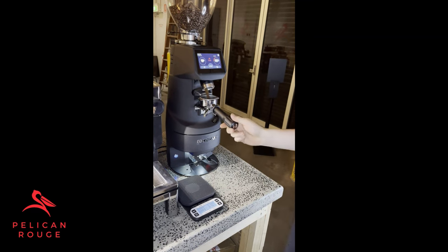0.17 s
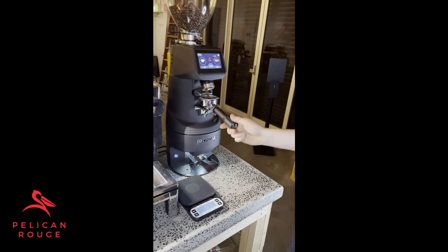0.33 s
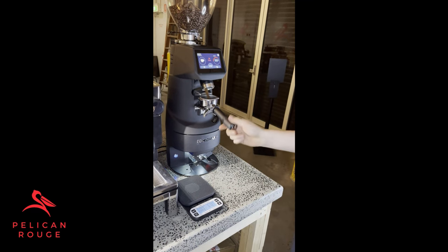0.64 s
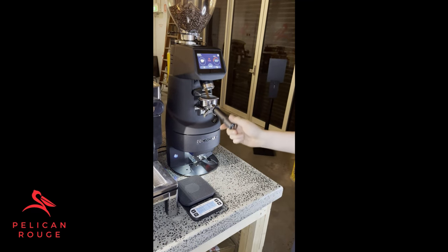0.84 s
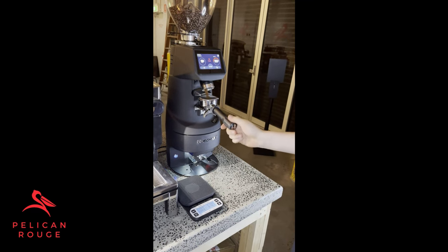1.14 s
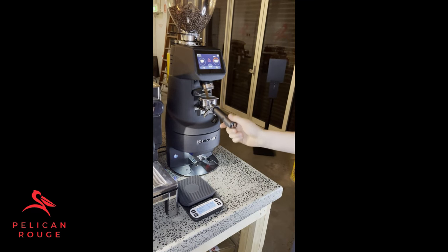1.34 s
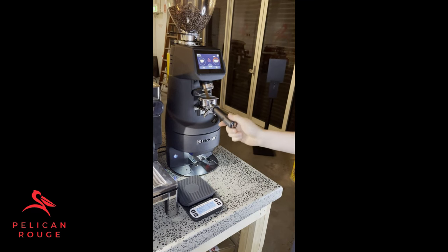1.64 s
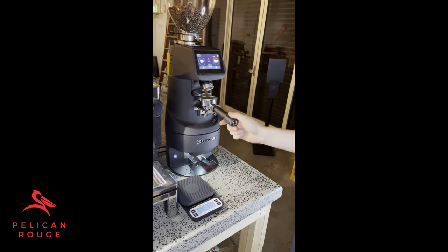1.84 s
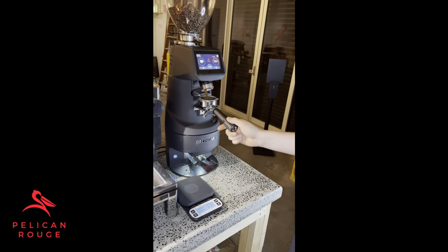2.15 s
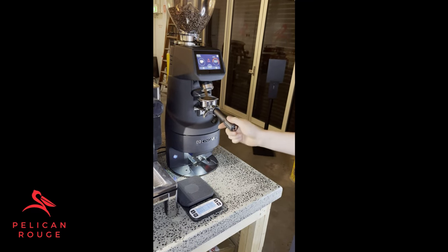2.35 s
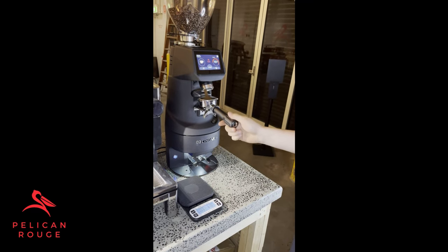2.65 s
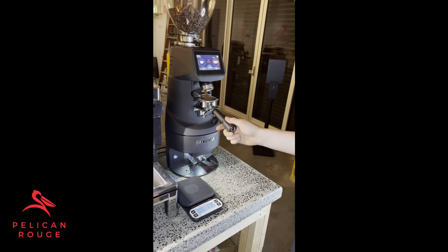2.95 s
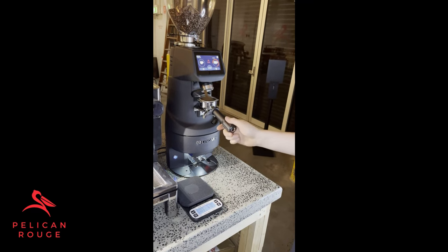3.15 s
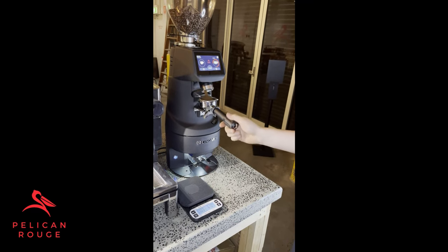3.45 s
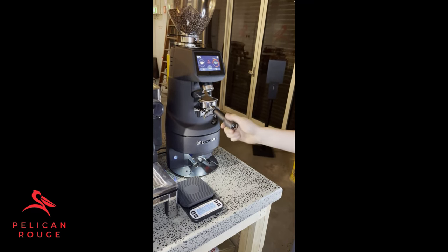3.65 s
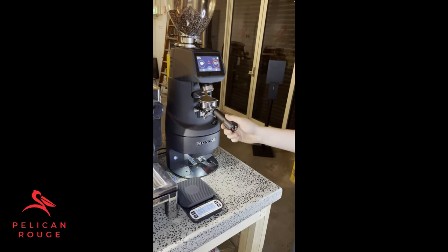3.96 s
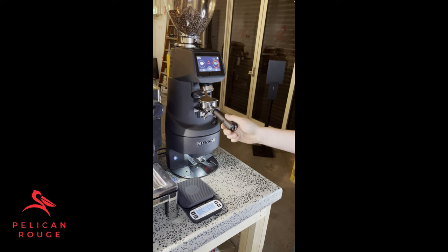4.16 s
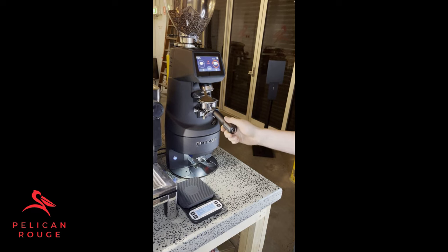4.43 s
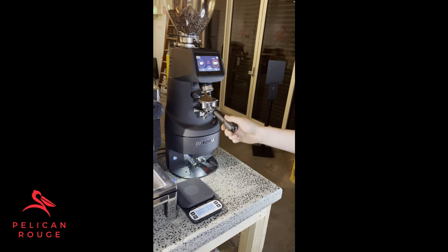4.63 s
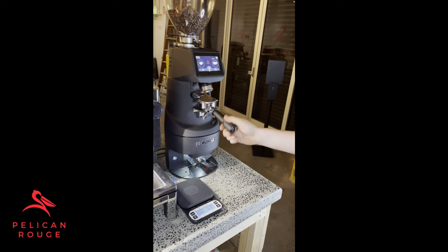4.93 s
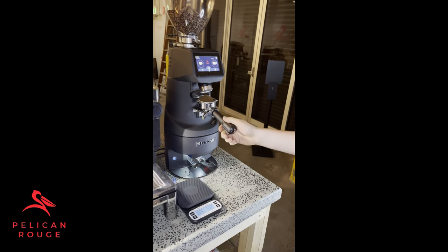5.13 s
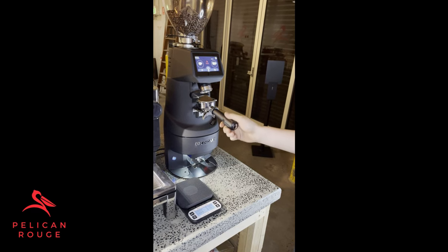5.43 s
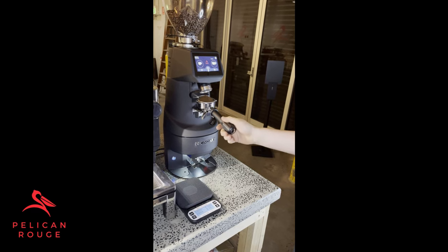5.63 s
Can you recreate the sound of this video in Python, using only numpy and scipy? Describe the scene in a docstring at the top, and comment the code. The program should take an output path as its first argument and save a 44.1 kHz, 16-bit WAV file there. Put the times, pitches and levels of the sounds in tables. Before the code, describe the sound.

Stereo, fairly close pickup, slightly left-leaning, in a small indoor room. Coarse, rattling burr noise dominates, with wavering resonant tones from the housing and a low mains hum. Rapid metal clacks with dull low thumps start early and repeat steadily. The grinder cuts out late with a very short falling whine, exposing the last knocks, faint steel scrapes and soft ventilation rumble.

```python
"""An electric espresso grinder hums and crunches about a metre away in a small cafe; it coasts down at 4.9 s.
Tones of mains and shaft make the motor; random clicks through resonances make beans, housing and chute.
A hand knocks the metal filter holder on its fork about five times a second, from 0.44 s and on after the stop:
grating noise bursts, ringing modes and a low thump, with a scrape ahead of each. Noise makes the cafe rumble."""
import sys
import numpy as np
from scipy import signal
from scipy.fft import rfft, irfft, next_fast_len
from scipy.io import wavfile
from scipy.ndimage import uniform_filter1d, map_coordinates

SR = 44100
rng = np.random.default_rng(int(sys.argv[2]) if len(sys.argv) > 2 else 0)


def dump(signal):
    """Clip the signal to [-1, 1] and save it as 16-bit WAV at the path in sys.argv[1]."""
    limited = np.clip(np.atleast_2d(signal).T, -1, 1)
    pcm = np.round(limited * 32767).astype(np.int16)
    wavfile.write(sys.argv[1], SR, pcm)


N = 255427
T = np.arange(N) / SR
FREQ = np.maximum(np.linspace(0, SR / 2, 8193), 1)
POWER_OFF_S, MAINS_HZ, SHAFT_HZ = 4.9, 50, 23.79


def undb(db):
    """Decibels to gain."""
    return 10 ** (np.asarray(db) / 20)


def unit(x):
    """Scale to rms 1."""
    return x / np.sqrt(np.mean(x ** 2))


def curve(rows):
    """Each column of a table, joined by straight lines in time and held flat beyond its ends."""
    s, *columns = np.transpose(rows)
    return [np.interp(T, s, c) for c in columns]


def walk(rate_hz):
    """Smooth random wander of spread near 1: held noise, averaged twice."""
    hold = max(int(SR / rate_hz), 1)
    steps = rng.standard_normal(N)[np.arange(N) // hold]
    return 1.185 * uniform_filter1d(uniform_filter1d(steps, hold), hold)


def wander(x, share, rate_hz):
    """Let the pitch of a sound wander by a small share."""
    read_at = np.arange(N) + np.cumsum(share * walk(rate_hz))
    return map_coordinates(x, [read_at], mode="mirror")


def play(x, response):
    """Sound each impulse of x with a response."""
    size = next_fast_len(N + len(response), True)
    return irfft(rfft(x, size) * rfft(response, size), size)[:N]


def colour(x, points, peaks=()):
    """Causal minimum-phase filter from a (Hz, dB) outline and resonances that stand out of it."""
    hz, db = np.transpose(points)
    db = np.interp(np.log(FREQ), np.log(hz), db)
    for centre_hz, width_hz, lift_db in peaks:
        db = db + lift_db / (1 + (2 * (FREQ - centre_hz) / width_hz) ** 2)
    cepstrum = irfft(np.log(undb(db)))
    # fold onto positive time
    cepstrum[1:] *= 2 * (np.arange(1, len(cepstrum)) < len(cepstrum) // 2)
    return play(x, irfft(np.exp(rfft(cepstrum))))


def resonate(x, hz, width_hz):
    """One resonance, gain 1 at its centre."""
    return signal.lfilter(*signal.iirpeak(hz, hz / width_hz, fs=SR), x)


def grains(rate_hz, spread_db):
    """Random clicks of either sign, many small and a few large."""
    hit = rng.random(N) < rate_hz / SR
    size_db = spread_db * np.minimum(rng.exponential(size=N), 5)
    return hit * np.sign(rng.standard_normal(N)) * undb(size_db)


def impulses(times_s, dbs):
    """One impulse for each event."""
    return np.bincount((np.asarray(times_s) * SR).astype(int), undb(dbs), N)[:N]


def ring(modes):
    """Half a second of decaying (Hz, dB, t60) modes, alternating in sign."""
    t = T[:SR // 2]
    response = np.zeros(len(t))
    for k, (hz, db, t60_s) in enumerate(modes):
        response += (-1) ** k * undb(db - 60 * t / t60_s) * np.sin(2 * np.pi * hz * t)
    return response


# Left-right scatter. Each row: frequency in Hz, gain of the side signal in dB.
SIDE_SCATTER = [(100, -29), (300, -9), (650, -12), (1100, -2), (1600, -26), (2500, -3.5), (3300, -4.5),
                (4200, -7.5), (6000, -15), (8000, -58), (16000, -23)]


def place(x, aside, room_db, t60_s=0.4):
    """Direct sound, a share that arrives from the sides, and the room's tail at each ear."""
    t = T[:SR // 2]
    sideways = colour(aside, SIDE_SCATTER)
    band = signal.butter(1, [200, 4000], "bandpass", fs=SR, output="sos")
    ears = []
    for side in (1, -1):
        envelope = np.exp(-np.log(1000) * t / t60_s) * np.minimum(t / 0.0066, 1)
        tail = signal.sosfilt(band, rng.standard_normal(len(t)) * envelope)
        room = play(x, undb(room_db) * tail / np.linalg.norm(tail))
        ears.append(x + side * sideways + room)
    return np.array(ears)


# Coast to rest, first row held until then. Each row: time in seconds, level in dB added to the
# grinding sounds, speed (only its ratio to the first row counts).
COAST_DOWN = [(4.89, -2.5, 0.96), (4.915, -6, 0.69), (4.942, -8, 0.59), (4.975, -7, 0.42),
              (5.0, -13.5, 0.32), (5.03, -16, 0.22), (5.17, -46, .05)]


def coasting():
    """Level in dB and speed ratio of the burrs over time."""
    level_db, speed = curve(COAST_DOWN)
    return level_db, speed / speed[0]


# Magnetic hum. Each row: multiple of the mains frequency, level in dB.
MAINS_HUM = [(2, -23.5), (6, -35.5)]
# Burr rotation. Each row: multiple of the shaft rate, level in dB before coasting.
ROTOR_TONES = [(6, -33), (9, -40), (12, -38), (16, -41), (21, -48), (24, -42), (48, -39), (96, -46)]


def motor():
    """Mains hum cuts off with the power; the rotor's tones waver and sink as it slows."""
    coast_db, speed_ratio = coasting()
    powered = np.clip((POWER_OFF_S - T) / 0.028 + .5, 0, 1)
    hum = rotor = 0
    for k, db in MAINS_HUM:
        hum = hum + undb(db + 0.49 * walk(9.9)) * np.sin(2 * np.pi * (k * MAINS_HZ * T + rng.random()))
    turns = np.cumsum(SHAFT_HZ * speed_ratio * (1 + 0.00251 * walk(5))) / SR
    for k, db in ROTOR_TONES:
        rotor = rotor + undb(db + 2 * walk(7.5)) * np.sin(2 * np.pi * (k * turns + rng.random()))
    # a whine slides down while the burrs slow
    fade = (1 - powered) * np.exp(-np.maximum(T - POWER_OFF_S, 0) / 0.057)
    whine = undb(-25) * (1 + 1.1 * walk(110)) * fade * np.sin(2 * np.pi * 37 * turns)
    return np.sqrt(2) * (powered * hum + undb(coast_db) * (rotor + whine))


# Crushing outline. Each row: frequency in Hz, relative density in dB per Hz.
CRUSH_COLOUR = [(30, -21), (50, -2), (130, 1), (240, -7), (450, 1.3), (700, -0.7), (1020, 2.5), (1260, -10),
                (2000, -1), (2550, -4), (3300, -4), (5300, -5), (6500, -9), (8500, -51)]
# Housing resonances. Each row: centre in Hz, width in Hz, lift in dB.
HOUSING_PEAKS = [(293, 19, 9.5), (1131, 32, 7), (1416, 264, 14.5), (1670, 220, 13), (1774, 30, 1.5),
                 (1932, 42, 7.5), (2250, 52, 7.5), (2378, 19, 8.5), (2921, 220, 10), (3540, 50, 6.5),
                 (3744, 50, 10), (4028, 284, 10.5), (4269, 160, 12), (5140, 570, 7)]
# Grounds in the chute. Each row: frequency in Hz, relative density in dB per Hz.
CHUTE_COLOUR = [(3000, -22), (7000, -56), (8500, 3.5), (10200, 11), (10700, 7.5), (11400, 15.5), (12200, 9),
                (13000, -18), (14300, 9.5), (15700, -3), (16500, -36)]


def burrs():
    """Beans crack in flurries and shake the housing, each at its own spot; grounds hiss down the chute."""
    coast_db, _ = coasting()
    flurry = undb(0.83 * walk(170) + 0.45 * walk(35))
    # whole beans shatter in short crunches
    crunch = play(abs(grains(rate_hz=64, spread_db=-2)), np.exp(-T[:SR // 10] / 0.0066))
    beans = grains(rate_hz=7000, spread_db=1) * flurry * (1 + 0.25 * crunch)
    grounds = grains(rate_hz=12000, spread_db=2.5) * flurry * undb(walk(45))
    running = undb(-22 + coast_db)
    layers = []
    # second pass: random signs scatter the grains to the sides
    for spot in (1, np.sign(rng.standard_normal(N))):
        cracking = undb(5) * unit(colour(beans * spot, CRUSH_COLOUR, HOUSING_PEAKS))
        hiss = undb(-14.5) * unit(colour(grounds * spot, CHUTE_COLOUR))
        layers.append((cracking + hiss) * running)
    front, aside = layers
    return place(front, aside, room_db=-16.5, t60_s=1.0)


def sing(drive, hz, width_hz, skirt_hz, hold):
    """A driven panel resonance; rubbing keeps it going, which evens out its swells."""
    y = unit(resonate(resonate(drive, hz, width_hz), hz, skirt_hz))
    power = uniform_filter1d(y ** 2, SR // 40) + 1e-3
    return unit(y / power ** (hold / 2))


# Hard beans catch. Each row: centre in seconds, relative level in dB, mean pitch in Hz,
# half length in seconds.
BEAN_SQUEAKS = [(0.065, -9, 1638, 0.0097), (0.257, -26, 2295, 0.11), (0.505, -14.5, 1638, 0.015),
                (.696, -15, 1637, 0.0084), (0.74, -11.5, 1640, 0.0084), (.898, -13, 1655, .013),
                (1.072, -14.5, 1634, .012), (1.135, -12, 1640, 0.014), (1.212, -10, 1633, .01),
                (1.424, -16, 1622, 0.015), (1.615, -13, 1630, 0.013), (1.752, -11, 1626, 0.01),
                (1.833, -14, 1602, 0.011), (2.007, -13, 1643, .011), (2.145, -12.5, 1619, 0.012),
                (2.184, -13.5, 1636, 0.01), (2.335, -16, 1633, 0.025), (2.42, -18, 1630, 0.016),
                (2.556, -13, 1620, 0.0086), (2.624, -10.5, 1635, 0.011), (2.657, -15, 1620, 0.026),
                (2.748, -8.5, 1620, 0.0068), (2.815, -11, 1625, .01), (2.957, -13.5, 1620, .01),
                (3.074, -13.5, 1616, .011), (3.371, -14.5, 1630, .012), (3.416, -11.5, 1630, 0.011),
                (3.526, -11, 1648, 0.009), (3.604, -13, 1684, 0.0078), (3.654, -9, 1633, 0.005),
                (3.715, -12.5, 1633, .011), (3.829, -15, 1630, 0.029), (4.225, -8, 1658, 0.0068),
                (4.313, -15, 1620, .022), (4.517, -16, 1633, .01), (4.905, -13.5, 1660, 0.014),
                (4.97, -20.5, 1630, .022)]


def squeaks():
    """A caught bean rubs out a short, unsteady tone that swells and dies; returns sound and strength."""
    waver = T + np.cumsum(0.00804 * walk(150)) / SR
    tone, strength = np.zeros(N), np.zeros(N)
    for s, db, hz, half_s in BEAN_SQUEAKS:
        near = abs(T - s) < 4 * half_s
        swell = undb(db) * np.exp(-((T[near] - s) / half_s) ** 2)
        tone[near] += np.sqrt(2) * swell * np.sin(2 * np.pi * hz * waver[near])
        strength[near] += swell
    return tone, strength


# Swells of the lower resonance. Each row: centre in seconds, lift in dB, half length in seconds.
LOW_SWELLS = [(0.14, 6, .035), (0.28, 5, 0.026), (0.36, 9, 0.011), (0.538, 9, 0.04), (0.615, 8.5, .022),
              (0.694, 10, 0.034), (0.805, 12, 0.05), (.99, 9, 0.019), (1.076, 1, 0.017),
              (1.148, 9.5, 0.035), (1.25, 9, 0.026), (1.37, 4, 0.021), (1.46, 8, 0.063),
              (1.577, 5.5, 0.021), (1.68, 9, 0.034), (1.772, 8.5, 0.029), (1.923, 9, 0.02),
              (2.294, 11, 0.028), (2.386, 9, 0.045), (2.64, 9, 0.037), (2.79, 8, .022), (2.872, 11, 0.024),
              (2.947, 7.5, .022), (3.016, 12, 0.021), (3.28, 10, 0.053), (3.388, 14, 0.019),
              (3.68, 10, .028), (3.743, 9.5, 0.021), (3.83, 8, .022), (3.916, 12.5, 0.026),
              (3.97, 8.5, 0.033), (4.074, 7, .04), (4.22, 6, 0.018), (4.372, 5, 0.045), (4.565, 7, 0.038),
              (4.695, 9, 0.033), (4.78, 9, 0.031), (4.963, 13.5, 0.048)]


def panels():
    """Two panel resonances sing under the crushing: the lower swells, both flutter; hard beans squeak."""
    coast_db, _ = coasting()
    swell_db = sum(db * np.exp(-((T - s) / half_s) ** 2) for s, db, half_s in LOW_SWELLS)
    low_gain = undb(-28.5 + swell_db + 1.95 * walk(55) + coast_db)
    high_gain = undb(-21 + 1.5 * walk(45) + coast_db)
    lows, highs = [], []
    for _ in range(2):
        low = sing(grains(rate_hz=1400, spread_db=2.5), hz=882.1, width_hz=21.7, skirt_hz=95, hold=0.58)
        lows.append(low_gain * wander(low, share=0.009, rate_hz=40))
        high = sing(grains(rate_hz=900, spread_db=2.5), hz=1644.5, width_hz=77, skirt_hz=400, hold=0.66)
        highs.append(high_gain * wander(high, share=0.01197, rate_hz=45))
    squeak, strength = squeaks()
    # a squeak of strength -13.5 dB takes over half of the upper resonance's swing
    upper = highs[0] / (1 + (strength / undb(-13.5)) ** 2) + undb(-2.2) * squeak
    lower_panel = place(lows[0], undb(-4.5) * lows[1], room_db=-15, t60_s=0.88)
    return lower_panel + place(upper, undb(-10) * highs[1], room_db=-16.5, t60_s=1.0)


# Cafe background. Each row: frequency in Hz, relative density in dB per Hz.
CAFE_COLOUR = [(20, -40), (32, -33), (45, 0), (63, 3.5), (85, -1), (140, -2), (210, -11.5), (320, -12),
               (500, -23), (1000, -22), (2200, -18), (5000, -37), (9000, -39), (16000, -61)]


def cafe():
    """Low rumble of fridges and ventilation, alike at both ears in the bass, with a faint mains tone."""
    mid, side = (unit(colour(rng.standard_normal(N), CAFE_COLOUR)) for _ in range(2))
    rumble = mid + colour(side, SIDE_SCATTER) * np.array([[1], [-1]])
    return undb(-34) * rumble + undb(-41) * np.sin(2 * np.pi * 4 * MAINS_HZ * T)


# Holder slides in the fork. Each row: start in seconds, relative level in dB, length in seconds.
HOLDER_SLIDES = [(5.038, -34, 0.02), (5.06, -35, 0.016), (5.102, -32.5, 0.015), (5.23, -37.5, 0.03),
                 (5.28, -33, 0.011), (5.386, -33, 0.017), (5.455, -34, 0.009), (5.58, -35, 0.012)]


def slides():
    """Short, bright scrapes of steel on steel: slides between late knocks and a tick ahead of each knock."""
    tick_lead_s, tick_db, tick_length_s = 0.0153, -37.5, 0.0045
    ticks = [(s - tick_lead_s, tick_db, tick_length_s) for s, *_ in HOLDER_KNOCKS]
    pressure = np.zeros(N)
    for s, db, length_s in list(HOLDER_SLIDES) + ticks:
        pressure += undb(db) * np.exp(-(2 * (T - s) / length_s - 1) ** 2)
    # each row: Hz, relative dB per Hz
    steel = [(500, -2), (2000, 2), (3800, 0.5), (5000, 3.5), (6500, -3.5), (9000, -23), (12500, -8), (16000, -20)]
    front, aside = (pressure * unit(colour(grains(rate_hz=3500, spread_db=4), steel)) for _ in range(2))
    return place(undb(1) * front, undb(-2) * aside, room_db=-4)


# Rocking after a knock, each time stiffer. Each row: delay in seconds, pitch in Hz,
# relative level in dB, half length in seconds.
BODY_REBOUNDS = [(.0086, 305, -15, 0.0044), (0.0218, 309.6, -10.5, 0.0048), (0.0317, 372, -15, 0.0093)]
# Boom in counter and room. Each row: frequency in Hz, relative density in dB per Hz.
BOOM_COLOUR = [(40, -21), (62, -5), (95, -5), (145, 1.5), (220, -1), (310, 1.5), (400, -3), (520, -19),
               (1000, -44)]
# Grinder on the counter. Each row: mode in Hz, relative level in dB, t60 in seconds.
BODY_MODES = [(60.2, -25, 0.53), (147, -16, 0.26), (218, -24, 0.4), (295, -16, 0.23)]


def body_thump():
    """Three quick rebounds rise in pitch; a diffuse boom and the body's modes linger in the counter."""
    boom_db, build_s, boom_t60_s = -24, 0.02, 0.38
    t = T[:SR // 2]
    rocking = np.zeros(len(t))
    for s, hz, db, half_s in BODY_REBOUNDS:
        rocking += undb(db) * np.exp(-((t - s) / half_s) ** 2) * np.cos(2 * np.pi * hz * (t - s))
    noise = unit(colour(rng.standard_normal(N), BOOM_COLOUR))[SR:SR + len(t)]
    boom = noise * undb(boom_db) * np.exp(-np.log(1000) * t / boom_t60_s)
    return rocking + (boom + ring(BODY_MODES)) * (1 - np.exp(-(t / build_s) ** 2))


# Knocks of the holder. Each row: time in seconds, then relative levels in dB of the clack,
# the metal's ring and the body's thump.
HOLDER_KNOCKS = [(0.4392, -24, -24, -2), (0.6629, -21, -31, 2.5), (0.864, -16.5, -28, -0.5),
                 (1.058, -21.5, -21, 0.5), (1.258, -26, -33, -5), (1.475, -19.5, -21, -4),
                 (1.6865, -16.5, -33, -2), (1.905, -18.5, -18, 0), (2.1155, -18, -23, 1.5),
                 (2.3233, -18.5, -25, 3), (2.539, -16, -26, 2), (2.7352, -19, -22, -0.5),
                 (2.936, -20, -25, -1), (3.14, -22, -17, 1), (3.323, -19.5, -24, 1.5),
                 (3.5199, -18.5, -23, -2), (3.708, -19, -17.5, 4), (3.8631, -20.5, -24, -3),
                 (4.0254, -23, -25, -1), (4.2183, -23, -27, 0), (4.396, -21, -15, 2), (4.589, -20, -20, -2),
                 (4.7607, -18.5, -30, 1), (4.959, -18.5, -18.5, 2.5), (5.1282, -23, -18.5, 3.5),
                 (5.31, -19, -19.5, 2.5), (5.487, -18.5, -18, 3), (5.6415, -21, -20.5, 2.5),
                 (5.7635, -23, -21.5, 2.5)]
# Contacts within a knock. Each row: mean delay in seconds, level in dB relative to the clack.
CHATTER_CONTACTS = [(0, -3.5), (.0014, -5.5), (.0042, -12), (.0075, -7)]
# Contact outline. Each row: frequency in Hz, relative density in dB per Hz.
CLACK_COLOUR = [(100, -12.5), (400, -7.5), (750, -1.5), (1100, 1.5), (1400, -8), (2200, -7.5), (3300, -5),
                (5000, -17.5), (6700, -7.5), (7800, -23.5), (9500, -12.5), (12000, -38), (15600, -25)]
# Holder and fork. Each row: mode in Hz, relative level in dB, t60 in seconds.
FORK_MODES = [(700, -5.5, 0.046), (910, -4.5, 0.061), (1139, -3, 0.037), (1280, -11, 0.026),
              (1524, -3.5, 0.034), (2150, -1.5, 0.065), (2360, -7.5, 0.04), (2620, -17, 0.044),
              (2700, -8.5, .05), (2980, -12, 0.063), (4160, -9, 0.034), (4880, -5, 0.022)]


def knocks():
    """The holder chatters on its fork; the heavy body answers a moment later with a low thump."""
    s, db, ring_db, thump_db = np.transpose(HOLDER_KNOCKS)
    contacts = np.zeros(N)
    for delay_s, size_db in CHATTER_CONTACTS:
        stretch = 1 + 0.22 * rng.standard_normal(len(s))
        contacts += impulses(s + delay_s * stretch, db + size_db)
    # each contact is a brief grating burst of noise
    burst = play(contacts, np.exp(-T[:SR // 10] / 0.0027))
    clack, clack_aside = (undb(16.5) * colour(burst * rng.standard_normal(N), CLACK_COLOUR) for _ in range(2))
    # mode levels vary a little from blow to blow
    metal = np.zeros(N)
    for k, mode in enumerate(FORK_MODES):
        favour_db = 1.5 * rng.standard_normal(len(s))
        blows = impulses(s + 0.001025, ring_db + favour_db)
        metal += undb(1.5) * play(blows, (-1) ** k * ring([mode]))
    thump = undb(-8.5 + 0.56 * walk(90)) * play(impulses(s, thump_db), body_thump())
    return place(clack + metal, clack_aside, room_db=-12.5) + place(thump, 0.36 * thump, room_db=-19.5)


def scene():
    """Grinder, room and filter holder."""
    return motor() + burrs() + panels() + cafe() + slides() + knocks()


# Lean of the stereo pair. Each row: frequency in Hz, left minus right in dB.
LEFT_LEAN = [(100, 1.2), (280, 2), (750, 3.5), (1050, 1.5), (1600, 0.5), (2500, 2), (3200, -0.3), (6000, 0)]


def record(dry):
    """The stereo pair mostly favours the left; its right side trails in the treble; the top is cut."""
    split_hz, treble_lag_s, top_hz = 4700, 0.000159, 16300
    size = next_fast_len(N + SR // 10, True)
    freq = np.maximum(np.arange(size // 2 + 1) * SR / size, 1)
    hz, db = np.transpose(LEFT_LEAN)
    lean = undb(np.interp(np.log(freq), np.log(hz), db) / 2)
    lag = np.exp(-2j * np.pi * np.maximum(freq - split_hz, 0) * treble_lag_s)
    ports = irfft(rfft(dry, size) * np.array([lean, lag / lean]), size)[:, :N]
    lowpass = signal.ellip(8, .2, 70, top_hz, fs=SR, output="sos")
    return signal.sosfilt(lowpass, np.clip(ports, -1, 1))


dry = scene()
out = record(dry)
dump(out)
```